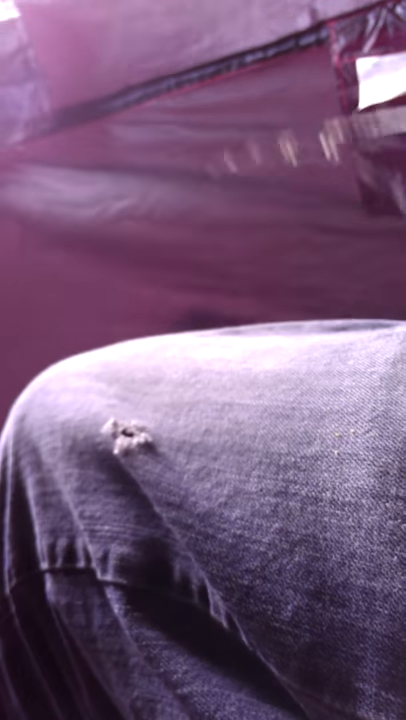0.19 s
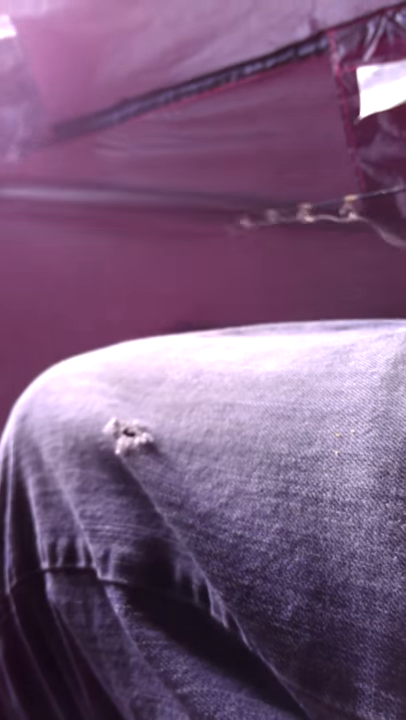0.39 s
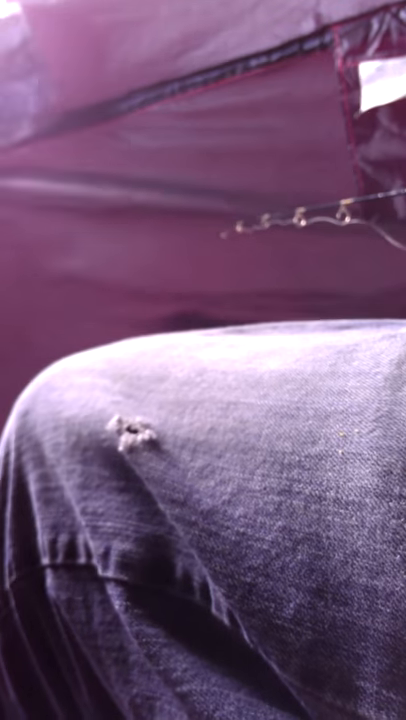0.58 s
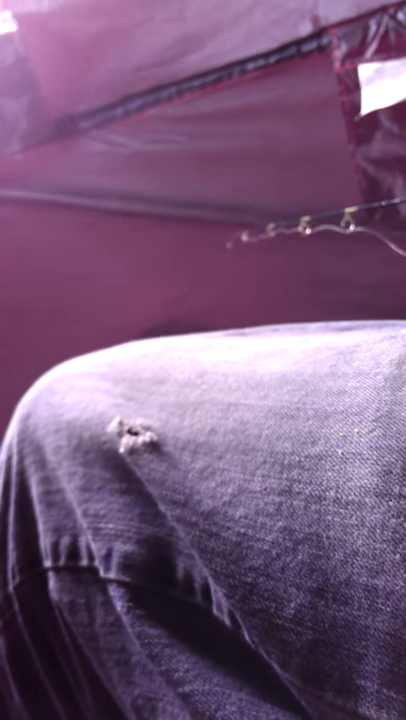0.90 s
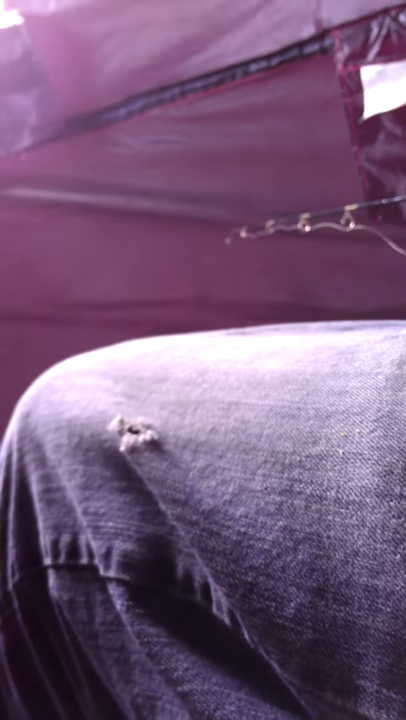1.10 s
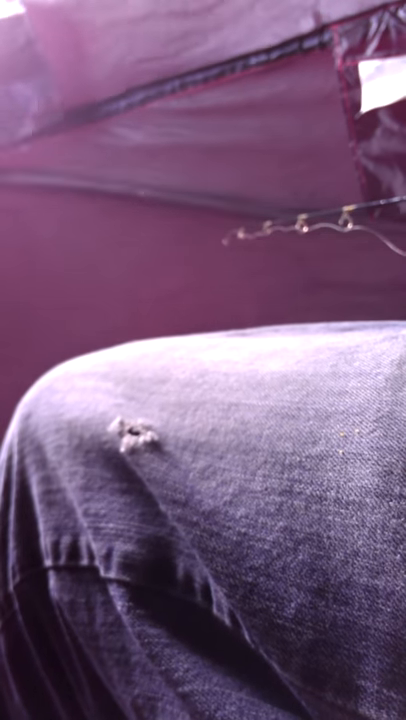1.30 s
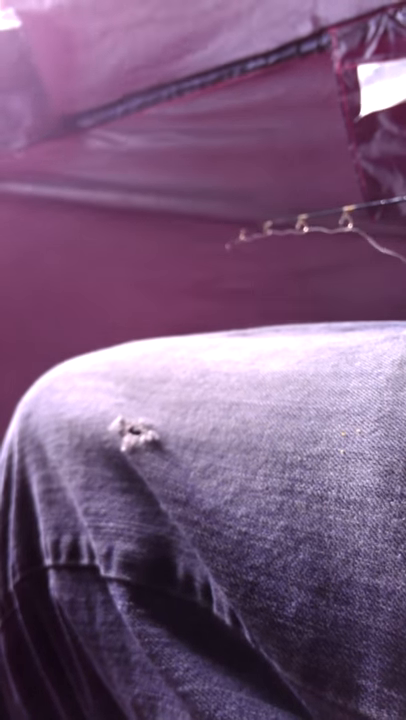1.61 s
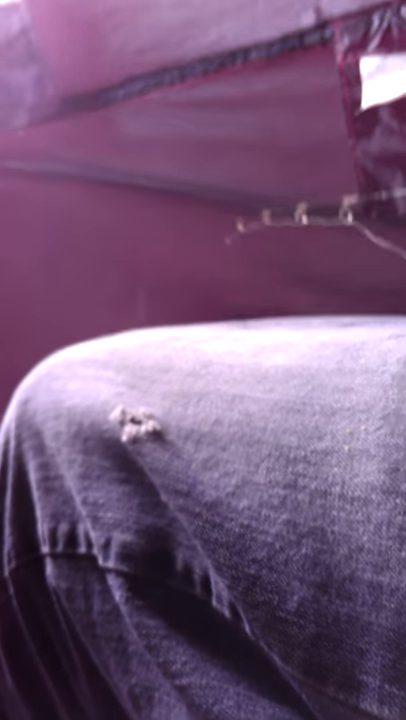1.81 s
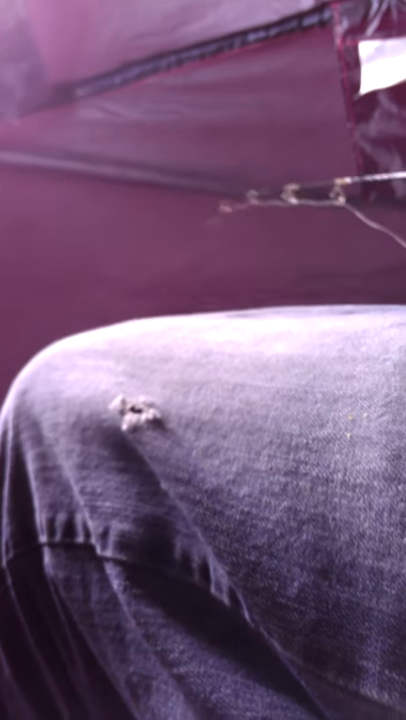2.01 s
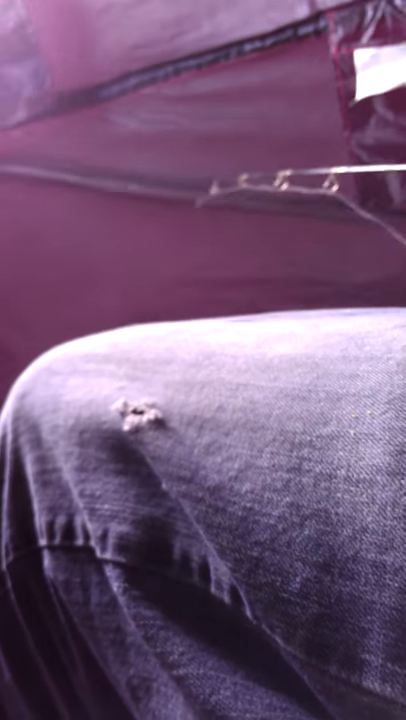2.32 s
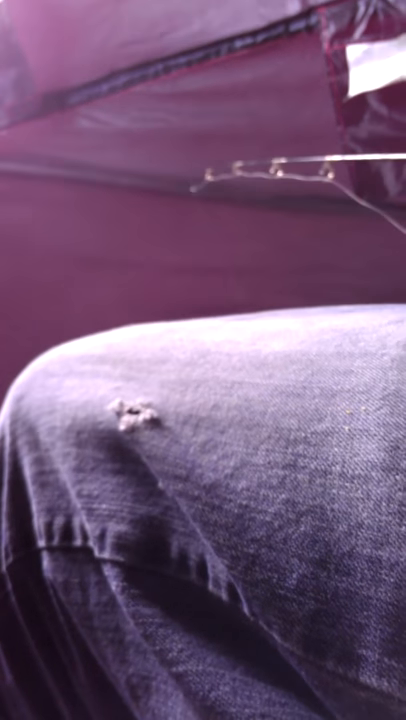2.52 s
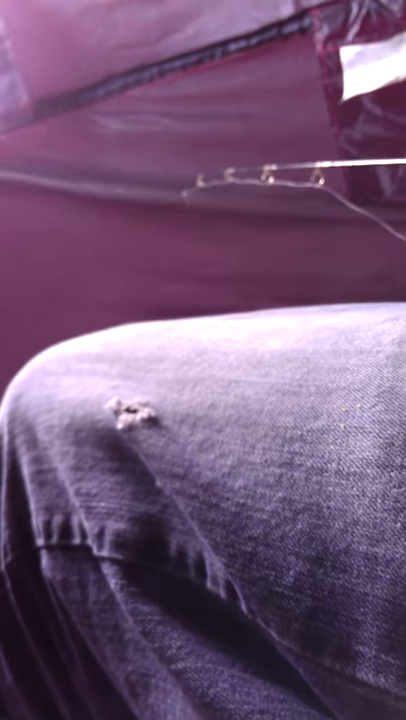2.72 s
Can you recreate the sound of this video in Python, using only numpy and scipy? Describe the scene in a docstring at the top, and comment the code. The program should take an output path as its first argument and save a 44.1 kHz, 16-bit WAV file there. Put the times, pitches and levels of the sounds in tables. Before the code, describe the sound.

Strong wind shakes the fabric walls around a stereo microphone inside a small shelter. Low rumble and fluttering run throughout, with a faint narrow hiss sinking at 0.2-0.6 s. Panels thump taut, heavily near 0.8 and 1.6 s, again at 2.1 and 2.5 s. Cloth swishes and small clicks scatter between; the sharpest snaps cluster at 2.4-2.5 s, then the shaking eases. Thin airy wind lies behind.

```python
"""Strong wind, heard from inside a small fabric shelter: restless walls rumble, flutter and hiss.
Panels flip taut with low booms that sag in pitch, and sharp folds snap as clicks in a ragged crackle.
Cloth slides on cloth in bright noise swells, and a narrow hiss of two sinking bands passes early on.
Thin wind noise from outside lies behind it all; a left-right microphone pair takes it in."""
import sys
import numpy as np
from scipy import signal
from scipy.fft import rfft, irfft, next_fast_len
from scipy.io import wavfile
from scipy.ndimage import uniform_filter1d, map_coordinates

SR = 44100
rng = np.random.default_rng(int(sys.argv[2]) if len(sys.argv) > 2 else 0)


def log_audio(samples):
    """Write samples as a 16-bit WAV file to the path given in sys.argv[1]."""
    # one column per channel
    frames = np.atleast_2d(samples).T
    # limit to full scale, then quantise
    limited = np.clip(frames, -1, 1)
    pcm = np.round(limited * 32767).astype(np.int16)
    wavfile.write(sys.argv[1], SR, pcm)


N = 127890  # length in samples

# Gusts on the walls all around. Each row: time in seconds, wall rumble in dB, flutter in dB,
# cloth hiss in dB, left-right difference of the rumble in dB; irregular shaking is added to the levels.
GUST_LEVELS = [(0, -46, -61, -61, -6.5), (.1, -57, -64, -67.5, 1), (.14, -42, -61, -56, -3),
               (.24, -47.5, -45, -64.5, 3), (.3, -49.5, -62.5, -57.5, 3), (.36, -43, -48.5, -52.5, -3),
               (.47, -41, -49, -51.5, 2.5), (.55, -44, -58, -56, -0.5), (.61, -55.5, -61, -59.5, 2),
               (.68, -40.5, -48, -52.5, 3), (.75, -40.5, -47.5, -69, -3), (.81, -33, -48, -48.5, 2.5),
               (.9, -44.5, -51, -57.5, 5), (.94, -42, -53.5, -62, 0), (1.1, -40, -53, -52.5, 5.5),
               (1.23, -56, -60, -58.5, 4), (1.29, -39, -52.5, -53, 2), (1.37, -50.5, -57, -60, 4),
               (1.44, -46, -47.5, -54.5, 3.5), (1.53, -46.5, -53, -64.5, 7.5), (1.595, -32, -45, -54, -7),
               (1.69, -47, -60.5, -61, 3), (1.75, -46.5, -56.5, -54, 1), (1.85, -57, -63, -63.5, 4),
               (1.9, -46, -48, -59, 2), (2.0, -39.5, -47.5, -59.5, 0), (2.11, -34.5, -41, -52.5, 1),
               (2.18, -41, -48, -54.5, -5), (2.28, -47.5, -50, -57.5, 2), (2.36, -66, -65, -63, 4),
               (2.39, -50.5, -49, -59, -1), (2.43, -46, -42, -58.5, -10), (2.493, -44, -49, -53, 7),
               (2.512, -43, -37, -58, -6), (2.54, -41.5, -51.5, -51.5, 1), (2.59, -46.5, -53, -56.5, -8),
               (2.62, -38.5, -48, -57, 0), (2.73, -60.5, -67, -69, 1), (2.825, -50.5, -54, -59, 0),
               (2.9, -52, -63.5, -71.5, -1)]


def gusts():
    """The wind shakes the walls without rest; one irregular shake moves rumble, flutter and hiss together."""
    low_db, mid_db, high_db, pan_db = curves(GUST_LEVELS)
    shake_db = 0.98 * wobble(22.4)
    rumble = wall_rumble(low_db + shake_db, pan_db)
    flutter = wall_flutter(mid_db + 0.53 * shake_db)
    hiss = cloth_hiss(high_db + shake_db)
    return rumble + flutter + hiss + outside_air(high_db)


# Colour of the wall rumble. Each row: frequency in Hz, relative density in dB per Hz.
RUMBLE_SPECTRUM = [(15, -54), (25, -27), (49, -1.5), (81, -4.5), (129, -5), (300, -19.5), (390, -47),
                   (660, -120)]
THUD_DB = -0.5  # thuds over their noise bed


def wall_rumble(level_db, pan_db):
    """Large panels move slowly: low noise with soft thuds in it."""
    thuds = grains(45, centre_hz=86.6, spread=0.69, cycles=0.33, range_db=3.0, pan_db=7.5)
    bed = rush(RUMBLE_SPECTRUM, patchy_db=1.0)
    return amp(level_db) * sides(pan_db) * unit(bed + amp(THUD_DB) * thuds)


# Colour of the flutter. Each row: frequency in Hz, relative density in dB per Hz.
FLUTTER_SPECTRUM = [(120, -59), (200, -2), (339, -7), (468, -2), (894, -9), (1340, -23.5), (2140, -27.5),
                    (3500, -33), (4550, -62), (7700, -120)]
PATTER_DB = -2  # small folds over their noise bed


def wall_flutter(level_db):
    """Many small folds patter over middle-range noise that wanders from side to side."""
    folds = grains(800, centre_hz=592.6, spread=0.45, cycles=0.81, range_db=1.7, pan_db=8.5)
    bed = rush(FLUTTER_SPECTRUM, patchy_db=3.5)
    moving_db = level_db + 2.1 * wobble(70)
    wander_db = 3.1 * wobble(7.2)
    return amp(moving_db) * sides(wander_db) * unit(bed + amp(PATTER_DB) * folds)


# Colour of the cloth hiss. Each row: frequency in Hz, relative density in dB per Hz.
HISS_SPECTRUM = [(880, -25), (1500, -9.5), (4120, -9.5), (5150, -2), (5710, -9), (6210, -4.5), (7420, -10),
                 (12200, -16.5), (14000, -26)]


def cloth_hiss(level_db):
    """Patchy treble noise from the shaken cloth."""
    return amp(level_db + 0.75 * wobble(24.36)) * rush(HISS_SPECTRUM, patchy_db=3.5)


# Panels flipping taut. Each row: start in seconds, level in dB, time to decay by 60 dB in seconds,
# pitch in Hz midway through the sag, left-right difference in dB.
BOOMS = [(0.216, -22, 0.095, 78, 0), (.45, -27.5, 0.21, 73, -1), (.664, -21.5, 0.1, 68, 5),
         (.768, -15, 0.091, 107.6, 0), (.801, -21, 0.073, 85, 7), (1.551, -26.5, 0.13, 92, -3),
         (1.573, -13, 0.12, 96.6, 2), (1.887, -25, 0.053, 83, -13), (2.098, -19, 0.066, 118.6, -4),
         (2.497, -19.5, 0.1, 89, -7), (2.604, -25.5, 0.071, 111, -1)]
BOOM_RISE_S = 0.0043
BOOM_SAG, BOOM_SAG_S = 0.41, 0.018  # pitch starts this fraction above midway, ends as far below
OVERTONE, OVERTONE_DB = 1.808, -6.5  # frequency ratio, level at the start
SIDE_TURN = 0.48  # phase lead on the left and lag on the right, radians


def booms():
    """A low push of a few cycles that sags in pitch and reaches the two sides a little apart."""
    out = np.zeros((2, N + SR))
    t = np.arange(SR // 3) / SR
    for start_s, db, t60, hz, pan_db in BOOMS:
        # integral of the sagging pitch
        sag_s = 2 * BOOM_SAG * BOOM_SAG_S * (1 - np.exp(-t / BOOM_SAG_S))
        phase = 2 * np.pi * hz * ((1 - BOOM_SAG) * t + sag_s)
        decay = amp(-60 * t / t60)
        fundamental = np.sin(phase + SIDE_TURN * np.array([[1], [-1]]))
        # the shared decay below shortens the overtone once more
        overtone = amp(OVERTONE_DB) * decay * np.sin(OVERTONE * phase)
        shape = (1 - np.exp(-t / BOOM_RISE_S)) ** 2 * decay
        i = round(start_s * SR)
        out[:, i:i + len(t)] += amp(db) * sides(pan_db)[:, None] * shape * (fundamental + overtone)
    return out[:, :N]


# Sharp folds in the cloth. Each row: time in seconds, relative level in dB, click pitch in Hz.
SNAPS = [(.349, -36, 950), (0.421, -34.5, 1220), (0.706, -36.5, 840), (0.788, -37, 1880), (.893, -39, 700),
         (0.968, -40, 1800), (0.981, -40.5, 1770), (1.008, -46.5, 1610), (1.069, -40, 700),
         (1.103, -37.5, 1060), (1.379, -37.5, 980), (1.438, -36, 945), (1.498, -41, 850),
         (1.577, -33.5, 790), (1.889, -35.5, 1600), (1.973, -38.5, 514), (2.003, -32.5, 555),
         (2.092, -33, 950), (2.175, -30.5, 1600), (2.287, -37.5, 1750), (2.381, -42.5, 1050),
         (2.41, -39, 715), (2.427, -30, 990), (2.445, -36, 905), (2.449, -26, 1150), (2.515, -22.5, 1050),
         (2.615, -32, 840), (2.623, -45, 1470), (2.659, -48, 615), (2.781, -40.5, 840)]
SNAP_LEAD_S = 0.000964  # the click starts this long before the listed time
SNAP_CYCLES, SNAP_CRACK_DB = 0.83, 1.5  # life of the click; crack level in the loudest fold
CRACK_GROWS = 0.71  # dB the crack gains on the click per dB of fold level; the crackle gains half of it
RATTLE_DB, RATTLE_LEAD_S, RATTLE_TAIL_S = -12.5, .004, 0.009


def snaps():
    """A short click with a crack on top, inside a ragged crackle that starts just before it."""
    out = np.zeros((2, N + SR))
    t = np.arange(-SR // 50, SR // 20) / SR
    rattle = grains(3500, centre_hz=1300, spread=0.55, cycles=0.8, range_db=2.5, pan_db=4)
    around = np.exp(-np.abs(t) / np.where(t < 0, RATTLE_LEAD_S, RATTLE_TAIL_S))
    loudest_db = max(db for s, db, hz in SNAPS)
    pans_db = rng.normal(-0.5, 0.94, len(SNAPS))
    for (s, db, hz), pan_db in zip(SNAPS, pans_db):
        i = round((s + t[0]) * SR)
        turns = hz * np.clip(t + SNAP_LEAD_S, 0, None)
        age = turns / SNAP_CYCLES
        hard_db = CRACK_GROWS * (db - loudest_db)
        click = np.e * age * np.exp(-age) * np.sin(2 * np.pi * turns)
        crack = amp(SNAP_CRACK_DB + hard_db) * np.exp(-2 * age) * np.sin(2 * np.pi * 2.2 * turns)
        crackle = amp(RATTLE_DB + .5 * hard_db) * around * rattle[:, i:i + len(t)]
        out[:, i:i + len(t)] += amp(db) * sides(pan_db)[:, None] * (0.57 * (click + crack) + crackle)
    return out[:, :N]


# Cloth slides. Each row: peak in seconds, level in dB, length in seconds,
# level of the lower part in dB relative to the upper.
SWISHES = [(.239, -52, 0.045, -16), (0.464, -43.5, 0.043, -9.5), (0.731, -43.5, 0.048, -11.5),
           (0.792, -39.5, 0.045, -11), (0.9, -58.5, 0.016, 2), (1.161, -45, 0.04, -10.5),
           (1.284, -49.5, 0.057, -13), (1.419, -55, 0.038, -10.5), (1.618, -44, 0.029, -11.5),
           (1.765, -49, 0.043, -15.5), (1.896, -57, 0.012, 6), (1.96, -55.5, 0.11, 1),
           (2.178, -43.5, 0.041, -8), (2.522, -42.5, 0.016, -2), (2.555, -46.5, 0.035, -25),
           (2.618, -51.5, 0.045, -27)]
# Colours of the upper and lower part. Each row: frequency in Hz, relative density in dB per Hz.
SWISH_SPECTRUM = [(2060, -32), (3500, -16.5), (5310, 0), (6940, -9.5), (8350, -10), (10000, -14.5),
                  (11800, -17.5), (14000, -18)]
SWISH_LOW_SPECTRUM = [(900, -35), (1500, -6), (2400, 0), (3800, -3), (5000, -30)]


def swishes():
    """Cloth sliding on cloth: bright noise swells, the upper part flickering, over a lower part."""
    upper_gain, lower_gain = 0, 0
    for peak_s, db, length, low_db in SWISHES:
        upper_gain = upper_gain + amp(db) * swell(peak_s, 0.42 * length, .5 * length)
        lower_gain = lower_gain + amp(db + low_db) * swell(peak_s, 0.4 * length, .5 * length)
    lower = lower_gain * rush(SWISH_LOW_SPECTRUM, patchy_db=.8)
    upper = amp(1.9 * wobble(120)) * upper_gain * rush(SWISH_SPECTRUM, patchy_db=1.5)
    return upper + lower


# The narrow hiss. Each row: time in seconds, level of the upper band in dB, its pitch in Hz.
NARROW_HISS = [(.19, -95, 5350), (.225, -56, 5330), (.32, -57.5, 5150), (.41, -60, 4930), (.56, -60, 4980),
               (.6, -95, 4950)]
NARROW_WIDTH_HZ = 280  # two standard deviations of the bell-shaped filter on the slow noise
UNDER_RATIO, UNDER_DB = .57, -6  # pitch and starting level of the weaker band below
UNDER_FADE_DB_PER_S = 19


def narrow_hiss():
    """Two narrow noise bands, made by shifting slow noise up in pitch, that sink together."""
    db, hz = curves(NARROW_HISS)
    ratios = np.array([[1], [UNDER_RATIO]])
    carriers = np.exp(2j * np.pi * np.cumsum(hz) / SR * ratios)
    slow = filtered(rng.standard_normal((4, N)), lambda f: np.exp(-.5 * (2 * f / NARROW_WIDTH_HZ) ** 2))
    upper, under = ((slow[:2] + 1j * slow[2:]) * carriers).real
    since_s = np.clip(np.arange(N) / SR - NARROW_HISS[1][0], 0, None)  # counted from the second row
    fade_db = UNDER_DB - UNDER_FADE_DB_PER_S * since_s
    return amp(db + 1.6 * wobble(36)) * (unit(upper) + amp(fade_db) * unit(under))


# Thin wind noise outside the shelter. Each row: frequency in Hz, relative density in dB per Hz.
AIR_SPECTRUM = [(4000, -16), (7000, -6), (14000, 0)]
AIR_DB, AIR_FOLLOWS = -69, .45  # mean level; dB of movement per dB of the cloth hiss


def outside_air(high_db):
    """Airy treble that follows the gusts but moves less than the cloth hiss."""
    level_db = AIR_DB + AIR_FOLLOWS * (high_db - high_db.mean())
    return amp(level_db) * rush(AIR_SPECTRUM, patchy_db=3.5)


def grains(per_s, centre_hz, spread, cycles, range_db, pan_db):
    """Many short damped grains of random pitch, size and side, rms 1."""
    count = int(per_s * N / SR)
    u, g = rng.random((count, 2)), rng.standard_normal((count, 2))
    hz = centre_hz * np.exp(spread * g[:, :1])
    t = np.arange(int(12 * SR / centre_hz)) / SR
    age = t * hz / cycles
    size = amp(-range_db * np.log(1 - u[:, 1:]))  # few large, many small
    grain = size * np.sin(2 * np.pi * hz * t) * age * np.exp(-age)
    at = ((u[:, :1] * N).astype(int) + np.arange(len(t))).ravel()
    gains = sides(pan_db * g[:, 1:])
    return unit(np.array([np.bincount(at, (grain * k).ravel(), N + SR)[:N] for k in gains]))


# Likeness of the two sides. Each row: frequency in Hz, left-right correlation from 0 to 1.
LIKENESS = [(60, 0.96), (150, 0.98), (370, 0.81), (910, 0.47), (2240, 0.31), (5540, 0.45), (13700, 0.17)]


def rush(spectrum, patchy_db):
    """Stereo noise of rms 1 with patches of random gain in time and frequency."""
    z = signal.stft(rng.standard_normal((2, N)), nperseg=512)[2]
    field = rng.standard_normal(z.shape[1:])
    for axis in (0, 1):
        field = uniform_filter1d(field, size=6, axis=axis)
    pair = signal.istft(z * amp(patchy_db * unit(field)), nperseg=512)[1][:, :N]

    def mid_side_response(hz):
        turn = np.arccos(np.clip(along(LIKENESS, hz), -1, 1)) / 2
        return amp(along(spectrum, hz)) * np.array([np.cos(turn), np.sin(turn)])

    mid, side = filtered(pair, mid_side_response)
    return unit(np.array([mid + side, mid - side]))


def swell(peak_s, rise_s, fall_s):
    """A bell-shaped rise to 1 and fall, each with its own standard deviation."""
    t = np.arange(N) / SR - peak_s
    return np.exp(-.5 * (t / np.where(t < 0, rise_s, fall_s)) ** 2)


def wobble(rate):
    """A smooth random curve, rate knots a second."""
    knots = rng.standard_normal(int(N * rate / SR) + 4)
    return map_coordinates(knots, [np.arange(N) * rate / SR])


def curves(rows):
    """One value per sample for each column after the time."""
    s, *cols = np.transpose(rows)
    return [np.interp(np.arange(N) / SR, s, c) for c in cols]


def along(points, hz):
    """Interpolates (Hz, value) points on a log frequency axis."""
    f, v = np.transpose(points)
    return np.interp(np.log(hz + 1), np.log(f + 1), v)


def filtered(x, response):
    """x times a response of frequency."""
    m = next_fast_len(N + SR // 2)
    return irfft(rfft(x, m) * response(np.fft.rfftfreq(m, 1 / SR)), m)[..., :N]


def sides(pan_db):
    """Left and right gains for a left-right difference in dB."""
    return amp(np.array([pan_db / 2, -pan_db / 2]))


def unit(x):
    """Scale to rms 1."""
    return x / np.sqrt(np.mean(x ** 2) + 1e-20)


def amp(db):
    """dB to gain."""
    return 10 ** (np.asarray(db) / 20)


def scene():
    """Everything heard inside the shelter, with the thin wind outside."""
    return gusts() + booms() + snaps() + swishes() + narrow_hiss()


# The microphone pair. Each row: frequency in Hz, left-right difference in dB.
MICROPHONE_LEAN = [(60, -7.5), (130, 5.5), (280, -6), (610, 1.5), (1340, -1), (2900, 0)]
LOW_CUT_HZ, TOP_HZ = 34, 14120


def record(dry):
    """The two microphones differ in colour, lose the deepest bass and keep nothing above the band limit."""
    def response(hz):
        low_cut = (1j * hz) ** 2 / (LOW_CUT_HZ ** 2 - hz ** 2 + 1.3j * hz * LOW_CUT_HZ)
        return sides(along(MICROPHONE_LEAN, hz)) * low_cut ** 2 * (hz < TOP_HZ)  # the cut acts twice

    return filtered(dry, response)


dry = scene()
out = record(dry)
log_audio(out)
```